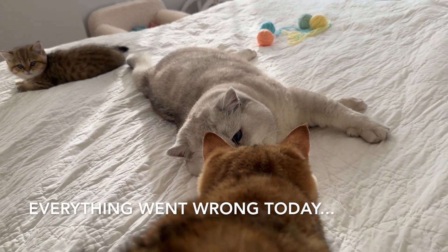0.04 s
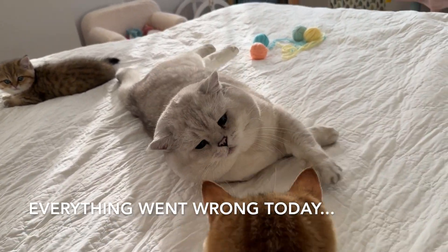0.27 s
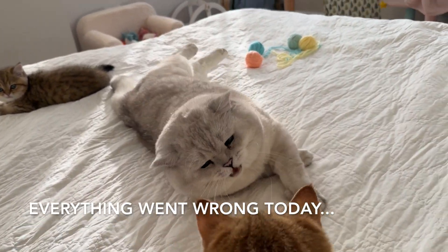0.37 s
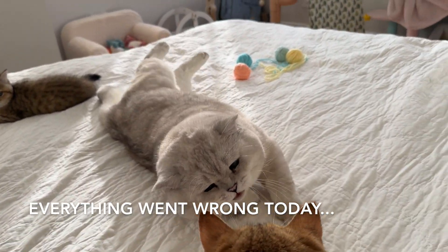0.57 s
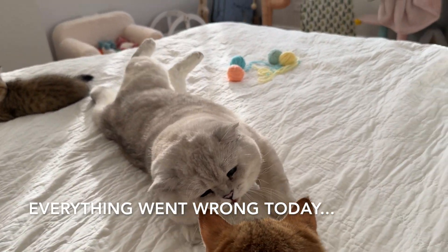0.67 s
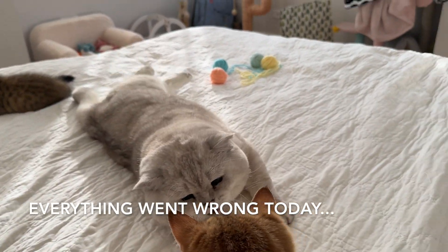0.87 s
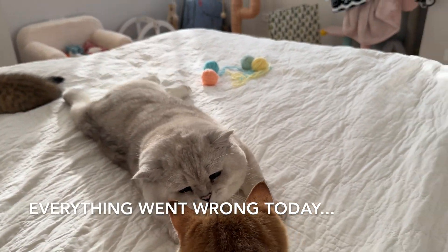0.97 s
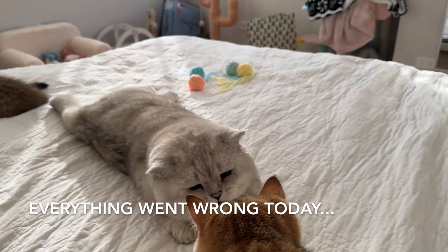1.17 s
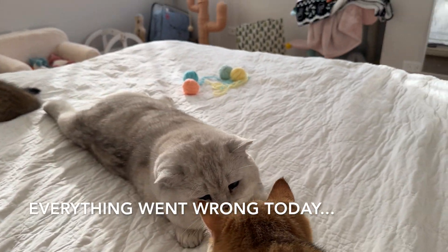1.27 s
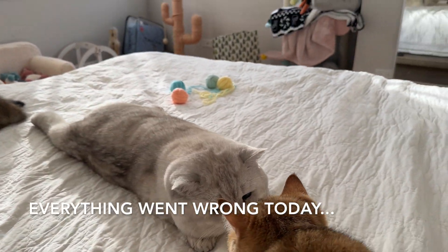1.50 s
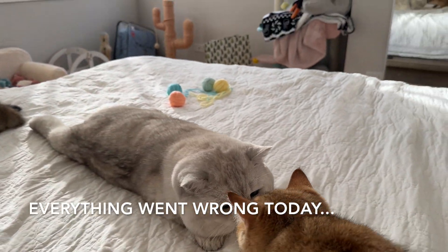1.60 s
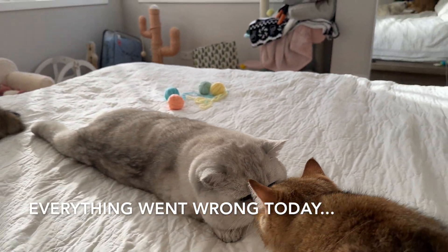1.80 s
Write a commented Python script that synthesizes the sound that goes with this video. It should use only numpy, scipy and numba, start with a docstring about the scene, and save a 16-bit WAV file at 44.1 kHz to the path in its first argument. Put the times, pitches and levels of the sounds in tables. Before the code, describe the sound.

A cat spits a short harsh hiss, then draws out a breaking yowl and low growl indoors

```python
"""A quiet, humming bedroom close up: a scrap of closed-mouth growl, then a cat on a bed
spits a short voiced hiss at another cat and draws out a yowl that starts harsh, clears, breaks to half
pitch and clears again. The low growl returns, with mouth clicks, soft bumps and fur sliding on the quilt.
Fold pulses and noise ring moving resonances for the voice; swelling sines make single growl pulses, clicks
and bumps; shaped noise and wavering sines make the room, whose short answer follows the cat."""
import sys
import numpy as np
from scipy import signal
from scipy.fft import rfft, irfft, next_fast_len
from scipy.io import wavfile
from scipy.ndimage import uniform_filter1d, map_coordinates
from numba import njit

SR = 44100
rng = np.random.default_rng(int(sys.argv[2]) if len(sys.argv) > 2 else 0)


def digitize_waveform(pressure):
    """Quantize a signal to 16-bit integers and store it at the path in sys.argv[1].

    Rows of a 2-D input are taken as channels; values are limited to [-1, 1].
    """
    field = np.atleast_2d(pressure).T
    bounded = np.clip(field, -1, 1)
    quanta = np.round(bounded * 32767).astype(np.int16)
    wavfile.write(sys.argv[1], SR, quanta)


N = 81585  # samples

# vocal folds in hiss and yowl [t/s, pitch f/Hz, roughness 0-1, period doubling 0-1]
FOLD_COURSE = [(.05, 370.8, .07, 0.7), (.08, 410.6, .4, 0.4), (.105, 499.2, 0.58, .3), (.15, 529.8, 0.6, 0),
               (.18, 427.4, 0.86, 0.35), (.24, 402.5, 0.86, .17), (.335, 419.4, 0.62, 0.3),
               (.38, 421, 0.63, 0.35), (.42, 446.3, 0.88, 1), (.46, 467.9, 0.68, .4),
               (.49, 471.8, 0.18, .05), (.56, 462, 0.19, .1), (.583, 479.9, 0.31, 0),
               (.695, 489.3, 0, 0.03), (.718, 512.6, 0.14, 0.1), (.757, 532, .08, 0), (.775, 522.5, .3, .9),
               (.805, 514.6, 0.74, 0.9), (.84, 531, .33, 0.9), (.92, 519.1, 0.21, .8),
               (.965, 527.2, 0.27, 0.2), (1.012, 542.8, 0.83, 1), (1.045, 540.4, .15, 0),
               (1.14, 504, 0, 0.05), (1.183, 530.8, .05, 0.05), (1.215, 538, 0.1, 0),
               (1.245, 639.6, .05, 0), (1.28, 703, 0.1, 0.4), (1.37, 707.4, 0.9, 0.4)]


def amp(db):
    """Decibels to gain."""
    return 10 ** (np.asarray(db) / 20)


def unit(x):
    """Scale to rms 1."""
    return x / np.sqrt(np.mean(x ** 2) + 1e-20)


def even(x):
    """Hold the short-time rms near 1."""
    power = uniform_filter1d(uniform_filter1d(x * x, size=600), size=400)
    return x / np.sqrt(np.abs(power) + 1e-12)


def along(points, hz):
    """Read (f/Hz, value) points on a log frequency axis."""
    f, v = np.transpose(points)
    return np.interp(np.log(hz + 1), np.log(f + 1), v)


def curves(rows):
    """One value per sample for each column after the time."""
    s, *cols = np.transpose(rows)
    return [np.interp(np.arange(N) / SR, s, c) for c in cols]


def during(rows):
    """A soft gate over the time span of a table."""
    t = np.arange(N) / SR
    inside = (t > rows[0][0]) & (t < rows[-1][0])
    return uniform_filter1d(1. * inside, size=400)


def wobble(rate):
    """A smooth random curve with rate knots a second."""
    knots = rng.standard_normal(N // 8)
    return map_coordinates(knots, [np.arange(N) * rate / SR], mode="wrap")


def filtered(x, response):
    """Multiply the spectrum of x by a response of frequency."""
    m = next_fast_len(N + SR // 2)
    return irfft(rfft(x, m) * response(np.fft.rfftfreq(m, 1 / SR)), m)[..., :N]


def coloured(x, points):
    """Causal, minimum-phase filter with the given (f/Hz, level/dB) shape."""
    m = 2 * next_fast_len(N)
    cepstrum = irfft(np.log(amp(along(points, np.fft.rfftfreq(m, 1 / SR)))))
    # folding the cepstrum forward makes the filter causal
    cepstrum[1:m // 2] *= 2
    cepstrum[m // 2 + 1:] = 0
    return irfft(rfft(x, m) * np.exp(rfft(cepstrum)))[..., :N]


@njit
def resonate(x, g, damping):
    """A state-variable band-pass whose centre and width move."""
    y, a, b = np.zeros(len(x)), 0., 0.
    for i in range(len(x)):
        band = (a + g[i] * (x[i] - b)) / (1 + g[i] * (g[i] + damping[i]))
        a, b = 2 * band - a, b + 2 * g[i] * band
        y[i] = band * damping[i]
    return y


def cavity(x, centre, width):
    """A moving resonance with steep skirts: two equal band-passes, each of the given width."""
    g, damping = np.tan(np.pi * centre / SR), width / centre
    return resonate(resonate(x, g, damping), g, damping)


def stereo_noise(spectrum):
    """Diffuse noise of rms 1, nearly mono in the bass, from mid and side noises."""
    # likeness of left and right [f/Hz, correlation]
    alike = [(60, 0.97), (250, 0.69), (1000, 0.06), (8000, 0.1)]

    def mid_side_response(hz):
        turn = np.arccos(np.clip(along(alike, hz), -1, 1)) / 2
        return amp(along(spectrum, hz)) * [np.cos(turn), np.sin(turn)]

    mid, side = filtered(rng.standard_normal((2, N)), mid_side_response)
    return unit(np.array([mid + side, mid - side]))


def background():
    """Shaped noise for room air, unsteady sines for the hum and flickering noise for fur on the quilt."""
    # room air colour [f/Hz, relative level/dB]
    air_colour = [(20, -29), (40, -3), (58, 3), (150, -4.5), (270, -3.5), (400, -9), (600, -13.5),
                  (1500, -17), (2400, -28.5), (5900, -39), (8300, -44), (9500, -56), (15500, -43.5)]
    # hum tones [f/Hz, mean level/dB]
    hum_tones = [(74, -62), (102, -62.5), (133, -63.5)]
    # fur sliding on the quilt, before its flicker [t/s, level/dB]
    rustle = [(1.5, -87), (1.58, -70), (1.77, -62), (1.85, -61.5)]
    # colour of the sliding fur [f/Hz, relative level/dB]
    cloth = [(300, -36.5), (800, 10.5), (1700, 15), (2600, -0.5), (6000, -17), (12000, -43)]
    air_db = -55
    t = np.arange(N) / SR
    hum = 0
    for hz, db in hum_tones:
        tone = unit(np.sin(2 * np.pi * hz * t + .5 * wobble(6.3)))
        hum = hum + amp(db) * tone * amp(1.6 * wobble(2.2))
    rustle_db = curves(rustle)[0] + 0.68 * wobble(39)
    return amp(air_db) * stereo_noise(air_colour) + hum + amp(rustle_db) * stereo_noise(cloth)


def growl():
    """Slow, uneven fold pulses and puffs ring two resonances behind a closed mouth, over a dull rasp."""
    # growl before the hiss and after the yowl [t/s, lower resonance f/Hz, overall level/dB]
    growl_course = [(0, 265, -58.5), (.05, 289, -53.5), (.08, 290, -95), (1.34, 285, -99.5),
                    (1.39, 281.5, -64), (1.42, 293, -51), (1.47, 339, -48.5), (1.52, 341, -47.5),
                    (1.583, 347, -46.5), (1.603, 328, -59)]
    # resonances [multiple of the lower resonance, width of each stage/Hz, relative level/dB]
    modes = [(0.999, 41.2, -4.5), (1.93, 76, -2.5)]
    # rasp colour [f/Hz, relative level/dB]
    rasp_colour = [(90, -48.5), (180, -0.5), (350, -6), (480, -3.5), (620, -9.5), (730, -9.5), (850, -24),
                   (1500, -26), (3000, -57.5)]
    pulse_hz, scatter = 50.06, .06  # scatter: share of the rate
    puff_gain, rasp_db = 0.73, -5.5  # puffs against pulses, rasp against the ring's levels
    centre, level_db = curves(growl_course)
    cycles = np.cumsum(pulse_hz * (1 + scatter * wobble(60))) / SR
    pulses = unit(np.diff(np.floor(cycles), prepend=0))  # one spike a cycle

    def puffs():
        return unit(rng.standard_normal(N) * (1 + 0.63 * np.cos(2 * np.pi * cycles)))

    flow = pulses + puff_gain * puffs()
    ring = sum(amp(db) * even(cavity(flow, multiple * centre, width)) for multiple, width, db in modes)
    rasp = amp(rasp_db) * even(coloured(puffs(), rasp_colour))
    return during(growl_course) * amp(level_db) * (ring + rasp)


def pulses_clicks_and_bumps():
    """Each click, soft bump or single growl pulse is a sine under an envelope that swells and dies."""
    # growl pulses, clicks and bumps [t/s, f/Hz, envelope peak level/dB, time from peak to 1/e/s]
    short_sounds = [(0.018, 713, -44, 0.0032), (0.05, 630, -41.5, 0.0049), (.092, 2190, -40, 0.002),
                    (0.381, 3600, -38.5, 0.00017), (1.331, 2110, -49.5, 0.00038),
                    (1.441, 611, -36.5, 0.0028), (1.518, 2070, -51, 0.00075), (1.597, 177, -45.5, 0.0082)]
    t = np.arange(N) / SR
    total = 0
    for s, hz, db, half in short_sounds:
        swell = np.exp(-np.abs((t - s) / half) ** 2.3)
        total = total + amp(db) * swell * np.sin(2 * np.pi * hz * (t - s))
    return total


def folds(count=22):
    """Fold pulses, alternately strong and weak when the voice breaks, mixed with puffs; also their phase."""
    jitter, quaver = .06, .007  # shares of the pitch; jitter scales with roughness
    shimmer_db, partial_db = 2, 1.6  # depths of random level; shimmer scales with roughness
    breath, break_wander = .85, .5  # puff share of power at full roughness, radians
    pitch, rough, doubling = curves(FOLD_COURSE)
    rough, doubling = np.clip(rough, 0, 1), np.clip(doubling, 0, 1)
    rate = pitch * (1 + jitter * rough * wobble(350) + quaver * wobble(59.5))
    phase = 2 * np.pi * np.cumsum(rate) / SR
    pulses = unit(sum(np.cos(k * phase) * amp(partial_db * wobble(24.96)) for k in range(1, count)))
    puffs = unit(rng.standard_normal(N) * (1 + 0.16 * np.cos(phase)))
    share = np.clip(breath * rough, 0, 1)
    flow = np.sqrt(1 - share) * pulses + np.sqrt(share) * puffs
    # a swing at half the pitch favours every other pulse
    alternation = 1 + doubling * np.cos(phase / 2 + break_wander * wobble(70))
    return flow * alternation * amp(shimmer_db * rough * wobble(300)), phase


def hiss_and_yowl():
    """Folds and turbulence sound through throat, moving jaw and mouth resonances and upper resonances."""
    # mouth resonance [t/s, centre f/Hz, width of each stage/Hz]
    mouth_course = [(.1, 2130, 800), (.13, 2530, 840), (.168, 2720, 800), (.2, 2040, 476), (.24, 1860, 990),
                    (.33, 1930, 605), (.38, 2410, 705), (.405, 2540, 730), (.445, 2910, 1090),
                    (.475, 2680, 806), (.495, 2520, 520), (.53, 2380, 408), (.6, 2500, 380),
                    (.68, 2645, 480), (.75, 2760, 810), (.8, 2787, 1830), (.92, 2200, 892.4),
                    (1.01, 2600, 810), (1.08, 2700, 910), (1.15, 3080, 1220), (1.23, 2180, 1398)]
    # low resonance that follows the jaw [t/s, centre f/Hz, level/dB]
    jaw_course = [(.04, 660, -86), (.094, 810, -51.5), (.13, 1030, -55), (.16, 910, -67.5),
                  (.188, 790, -46), (.228, 730, -54), (.336, 865, -54), (.37, 820, -62), (.39, 785, -53),
                  (.45, 743, -51.5), (.5, 826, -90)]
    # fixed colours of the voice's bands [f/Hz, relative level/dB]
    throat_colour = [(250, -35), (550, -11), (700, -3), (820, -1), (950, 0), (1060, -1), (1300, -3),
                     (1440, -6), (1600, -2), (1900, -7), (2500, -30)]
    mouth_colour = [(900, -42), (1500, -7), (2000, -1), (3300, 0.5), (4200, -6.5), (6000, -2.5),
                    (9000, -42)]
    treble_colour = [(2600, -40), (3300, -2), (3900, 5.5), (4600, 4), (5400, 3.5), (5900, -2), (6600, -1),
                     (7200, -7), (8400, -27), (11000, -29), (15500, -72)]
    # band levels before their trims, one list for the hiss and one for the yowl [t/s, level/dB]
    fundamental_level = [
        [(0.04, -58), (0.078, -47.5), (0.162, -57), (0.18, -53.5), (0.248, -55), (0.27, -44.5), (0.32, -43),
         (0.365, -61)],
        [(0.372, -50), (0.41, -55.5), (0.47, -54.5), (0.842, -54.5), (0.868, -61.5), (1.056, -48),
         (1.08, -53.5), (1.268, -51.5), (1.3, -100)],
    ]
    throat_level = [
        [(.04, -67), (.132, -45.5), (.166, -50), (.235, -45.5), (.286, -53.5), (.332, -51), (0.365, -72)],
        [(0.372, -59), (0.39, -52), (0.506, -59.5), (0.702, -59), (0.86, -54), (0.876, -58.5), (1.208, -53.5),
         (1.3, -75.5)],
    ]
    mouth_level = [
        [(.04, -68), (.1, -69.5), (0.12, -31.5), (0.152, -37), (0.202, -32), (0.22, -49.5), (0.284, -54.5),
         (0.334, -53.5), (0.365, -63.5)],
        [(0.372, -57), (0.382, -36), (0.396, -35.5), (0.498, -40.5), (0.616, -38), (0.634, -43), (0.914, -52.5),
         (1.03, -44.5), (1.206, -54.5), (1.3, -85)],
    ]
    treble_level = [
        [(.04, -75), (0.104, -62.5), (0.122, -42), (0.152, -51), (0.164, -43), (0.244, -64.5), (0.365, -69)],
        [(0.372, -61.5), (0.408, -48), (0.452, -54.5), (0.482, -57.5), (0.69, -54), (0.774, -42), (.87, -52),
         (.938, -56.5), (1.025, -49.5), (1.214, -59.5), (1.37, -80.5)],
    ]
    # partial at one and a half times the pitch, heard when the voice breaks [t/s, level/dB]
    break_level = [(.37, -64), (.41, -55), (.455, -62), (.49, -77.5), (.745, -79), (.77, -53), (.81, -47),
                   (.86, -48), (.94, -49.5), (1.015, -53.5), (1.05, -76), (1.1, -94)]
    fundamental_db, throat_db, mouth_db, treble_db = -1.5, 1, 0, -1  # trims
    mouth_air, treble_air, clear_air = 0.25, 1.5, .55  # turbulence gains; clear_air at no roughness
    jaw_width_hz, air_width_hz = 220, 790  # each stage; air_width_hz widens the mouth for turbulence
    flow, phase = folds()
    rough = curves(FOLD_COURSE)[1]

    def level(parts, trim_db):
        rows = [row for part in parts for row in part]
        return amp(curves(rows)[0]) * amp(trim_db)

    def air():
        return rng.standard_normal(N) * (clear_air + np.clip(rough, 0, 1))

    centre, width = curves(mouth_course)
    jaw_hz, jaw_db = curves(jaw_course)
    mouth = cavity(flow, centre, width) + mouth_air * cavity(air(), centre, width + air_width_hz)
    voice = level(fundamental_level, fundamental_db) * unit(np.cos(phase))
    broken = unit(np.cos(phase + phase / 2 + 2 * rough * wobble(110)))
    voice += amp(curves(break_level)[0]) * broken
    voice += amp(jaw_db) * even(cavity(flow, jaw_hz, jaw_width_hz))
    voice += level(throat_level, throat_db) * even(coloured(flow, throat_colour))
    voice += level(mouth_level, mouth_db) * even(coloured(mouth, mouth_colour))
    voice += level(treble_level, treble_db) * even(coloured(flow + treble_air * air(), treble_colour))
    return during(FOLD_COURSE) * voice


def room(x):
    """The short, soft answer of a furnished bedroom: decaying noise with a faint later tail."""
    near_t60_s, far_t60_s, far_db = 0.016, 0.2, -11.5  # far_db: start against the near decay
    t = np.arange(SR // 2) / SR
    decay = amp(-60 * t / near_t60_s) + amp(far_db - 60 * t / far_t60_s)
    tail = rng.standard_normal((2, len(t))) * decay * (t > .001)  # 1 ms gap ahead of the answer
    return signal.fftconvolve(x[None], tail / np.linalg.norm(tail[0]), axes=1)[:, :N]


def scene():
    """The cat lies close by, a little to the right: louder and earlier there by level and time offsets."""
    # level balance of the direct sound [t/s, left minus right level/dB]
    pan = [(.1, -5), (.3, -6.5), (.57, -8.5), (.8, -2), (1.05, -4.5), (1.25, -2), (1.5, -4)]
    # strength of the reflections [f/Hz, relative level/dB]
    walls = [(300, -24), (700, -5), (1300, 4.5), (8000, -1.5)]
    lag_s, room_db = .00004, -4  # left behind right, room gain
    cat = hiss_and_yowl() + growl() + pulses_clicks_and_bumps()
    pan_db, = curves(pan)
    sides = np.array([[-1], [1]])  # left delayed, right advanced by half the lag
    direct = filtered(cat, lambda hz: np.exp(1j * np.pi * hz * lag_s * sides))
    direct = direct * amp([pan_db / 2, -pan_db / 2])
    return direct + amp(room_db) * room(coloured(cat, walls)) + background()


def record(dry):
    """The microphone signal keeps nothing from 15800 Hz up."""
    return filtered(dry, lambda hz: hz < 15800)


dry = scene()
out = record(dry)
digitize_waveform(out)
```